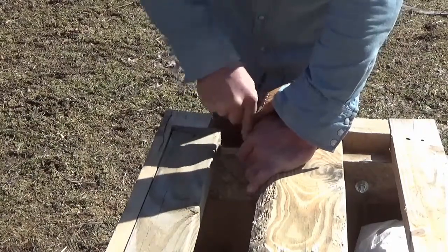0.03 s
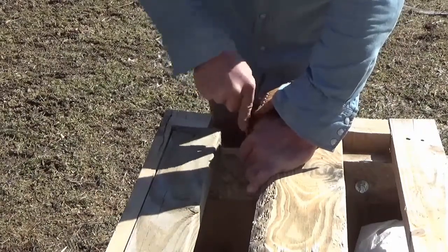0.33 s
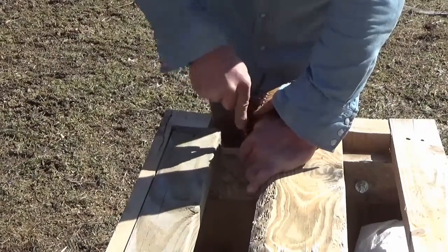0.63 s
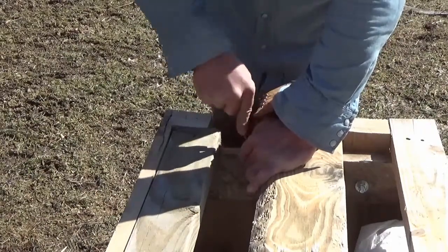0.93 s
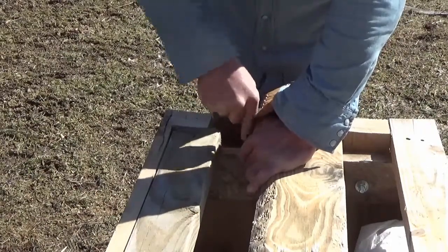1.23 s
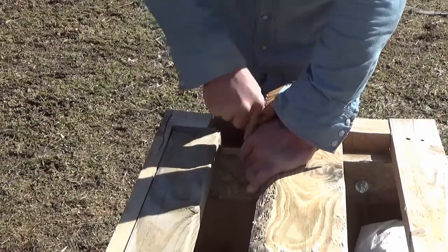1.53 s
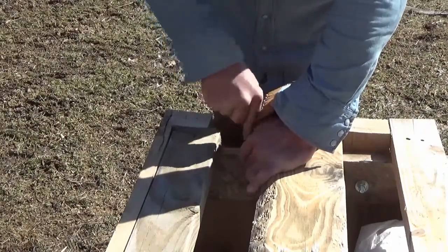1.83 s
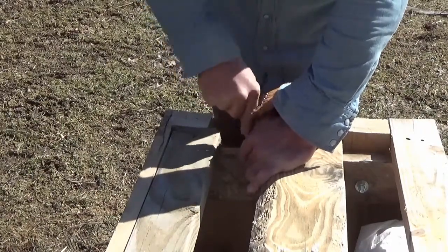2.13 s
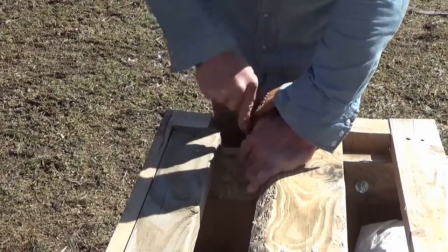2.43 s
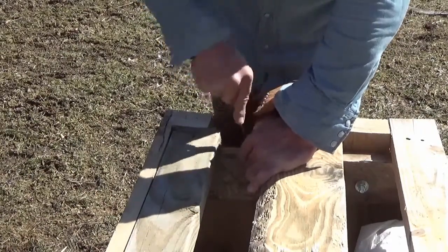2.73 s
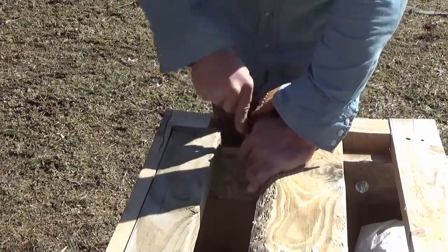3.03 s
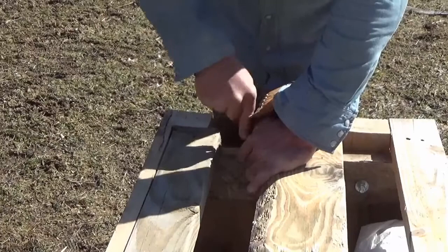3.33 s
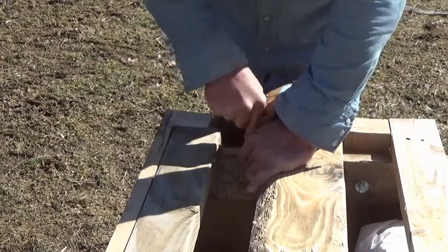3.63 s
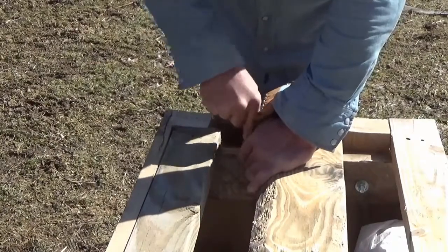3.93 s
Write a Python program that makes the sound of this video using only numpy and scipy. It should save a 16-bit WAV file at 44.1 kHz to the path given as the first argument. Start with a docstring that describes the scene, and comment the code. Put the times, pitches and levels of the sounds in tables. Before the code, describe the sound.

A small hand saw rasps through wood from the start to about 4 seconds, at nearly four back-and-forth strokes a second. Bright, hissing cuts alternate with softer returns, over the hollow resonance of the boards, with scattered snags and faint squeaks. Near 2.8 seconds the blade binds with a brief wooden honk; the next two cuts are weaker, then the sawing recovers. A quiet, distant outdoor rumble lies underneath.

```python
"""Quick to-and-fro rasping: a small hand saw works through wood held on a pallet, outdoors.
The teeth knock the wood at a rate that follows the blade's speed, so each stroke sweeps down through
the boards' modes as it slows. Tearing fibres hiss and ring the blade: cuts are loud and bright,
returns rasp more softly. Now and then a tooth snags, faint squeaks slip in, and once a board honks.
Short reflections off the boards and ground widen the saw over a quiet bed of distant rumble."""
import sys
import numpy as np
from scipy import signal
from scipy.fft import rfft, irfft, next_fast_len
from scipy.io import wavfile

SR = 44100
rng = np.random.default_rng(int(sys.argv[2]) if len(sys.argv) > 2 else 0)


def digitize_waveform(pressure):
    """Quantize a signal to 16-bit integers and store it at the path in sys.argv[1].

    Rows of a 2-D input are taken as channels; values are limited to [-1, 1].
    """
    field = np.atleast_2d(pressure).T
    bounded = np.clip(field, -1, 1)
    quanta = np.round(bounded * 32767).astype(np.int16)
    wavfile.write(sys.argv[1], SR, quanta)


N = 176400
TIME = np.arange(N) / SR
CUTTING, RETURNING = 0, 1   # stroke direction: picks the cut or return level in the tables

# spectrum of the distant rumble and air (frequency [Hz], level [dB])
AIR_SPECTRUM = [(20, -5), (55, -9), (72, 1.5), (105, 5.5), (200, 6.5), (500, -8), (1500, -12.5),
                (5000, -24), (11000, -26)]
# squeaks, mostly faint and between strokes (centre [s], half-length [s], pitch [Hz], level [dB])
SQUEAKS = [(0.248, 0.017, 1630, -49), (0.498, 0.014, 1630, -42.5), (0.659, 0.018, 4140, -50),
           (0.916, .012, 4000, -46), (1.180, 0.014, 4160, -53), (1.183, 0.02, 3300, -49),
           (1.434, 0.025, 1755, -45), (1.683, 0.019, 4060, -54), (1.696, 0.021, 1750, -42),
           (1.947, 0.022, 4014, -51), (2.208, .02, 2160, -50), (2.865, 0.022, 4640, -46),
           (3.122, 0.013, 3316, -44), (3.767, 0.01, 3690, -46)]
# modes of the wood and pallet (frequency [Hz])
WOOD_HZ = [108, 160, 198, 245, 293, 400, 470, 578, 655, 795, 940, 1050, 1218, 1525, 1825, 2035, 2150]
# voicing of each wood mode (bandwidth [Hz], cut level [dB], return level [dB])
WOOD_VOICING = [(19.4, 2, 1.5), (30, 6, 8), (30, 10, 12.5), (36, 12.5, 12.5), (27.8, 18, 17.5),
                (41.2, 8, 1), (29.5, 10, 4.5), (42.3, 9.5, 4.5), (33.2, 11, 11.5), (69, 9.5, -3),
                (32, 8, 3.5), (41.2, 11.5, 7), (44, -18, 0), (42.5, 1, -3.5), (87, 4.5, -3.5),
                (54.4, 7.5, -7.5), (43.3, 4, -3.5)]
# modes of the blade (frequency [Hz])
BLADE_HZ = [2990, 5830, 6190, 7035, 7690, 8680, 8980, 10000]
# voicing of each blade mode (bandwidth [Hz], cut level [dB], return level [dB])
BLADE_VOICING = [(90, 1.5, 5.5), (164, -9, 6.5), (200, -4, 5.5), (124, 7.5, 0), (382, 10, 4),
                 (150, 6.5, 2.5), (240, 3, 5), (210, 0, 5)]
# hiss of tearing fibres (frequency [Hz], cut level [dB], return level [dB])
FIBRE_SPECTRUM = [(40, -19, -34), (122, -4.5, 0.5), (430, -1.5, 7), (1140, 3.5, 6.5), (2380, -3.5, 4),
                  (3750, -4.5, -1), (5220, -13, -2.5), (5980, 3, -6), (7650, -4, -1.5), (9060, 6, 3.5),
                  (11860, -7.5, -6)]
# snagging teeth (time [s], rasp level [dB], knock level [dB])
SNAGS = [(0.272, -21.5, -25), (0.702, -16, -17), (0.796, -18.5, -23), (.807, -21, -26), (1.054, -28.5, -22),
         (1.234, -23, -27), (1.491, -21, -12), (1.708, -20.5, -16), (1.743, -28, -40),
         (2.085, -27.5, -22.5), (2.258, -30, -15), (2.798, -13, -32), (2.815, -15.5, -28),
         (2.888, -14, -10.5), (3.297, -22, -14.5), (3.317, -18, -25), (3.353, -19, -22), (3.858, -20, -25)]
# cutting strokes (start [s], length [s], rasp level [dB], knock level [dB], pressure rise [dB])
CUT_STROKES = [(.139, 0.096, -26.5, -26.5, -4), (.398, 0.083, -23.5, -24.5, 3.5),
               (.670, 0.088, -24, -24.5, 0), (.927, 0.082, -22.5, -24.5, 4.5),
               (1.197, 0.082, -23.5, -25, -4), (1.449, 0.091, -21.5, -24.5, -3),
               (1.707, 0.085, -22.5, -24, 3), (1.967, 0.083, -23, -25, -3.5),
               (2.226, 0.087, -24, -25, -3.5), (2.499, 0.082, -20.5, -23.5, 3),
               (2.762, 0.087, -22, -24, -3.5), (3.048, 0.085, -31.5, -30, 6.5),
               (3.296, 0.084, -28, -26.5, 12), (3.555, .096, -24.5, -25.5, -4),
               (3.812, 0.093, -23, -26, -4)]
# return strokes (start [s], length [s], rasp level [dB], knock level [dB], pressure rise [dB])
RETURN_STROKES = [(.010, .085, -31, -21, 0.5), (.273, 0.075, -32.5, -21.5, -5),
                  (.527, 0.089, -33.5, -23, -1.5), (.797, 0.074, -28, -21, 8),
                  (1.056, 0.089, -34.5, -24, -1), (1.319, 0.069, -29, -21, 0.5),
                  (1.572, 0.091, -34, -25.5, 0.5), (1.828, 0.091, -32.5, -23.5, 1),
                  (2.094, 0.083, -33.5, -24.5, 3.5), (2.352, 0.1, -32.5, -23, 3),
                  (2.623, .096, -32.5, -25.5, 1.5), (2.890, .094, -30, -21.5, 2.5),
                  (3.168, 0.09, -33.5, -26, 2.5), (3.428, 0.083, -31.5, -25, 4),
                  (3.683, 0.09, -30.5, -23, 3.5), (3.933, 0.091, -33.5, -26, -5)]
# contour of a cut (position [stroke lengths], tooth rate [1/s], rasp trim [dB], knock trim [dB])
CUT_CONTOUR = [(-.15, 300, -29, -13), (0, 450, -15.5, -2), (.06, 650, -4.5, 3.5), (.3, 950, -5, 2),
               (.5, 1050, 1.5, 4), (.64, 600, -2.5, 7), (.75, 310, -8.5, 2), (.9, 270, -10, -1),
               (1, 220, -23, -9), (1.25, 120, -40, -24.5)]
# contour of a return (position [stroke lengths], tooth rate [1/s], rasp trim [dB], knock trim [dB])
RETURN_CONTOUR = [(-.2, 199.9, -7.5, -26), (-.01, 300.1, -17, -11.5), (.03, 500.6, 2.5, 2.5),
                  (.22, 798, -0.5, 0), (.48, 997.1, 0, 5), (.64, 638, -2.5, 0), (.78, 297.9, -5.5, 1.5),
                  (.98, 239.3, -19.5, -15.5), (1.25, 120.7, -26.5, -22)]


def from_db(db):
    """Decibels to gain."""
    return 10 ** (np.asarray(db) / 20)


def drift(hz):
    """A smooth random modulator of spread 1, moving at rates up to about hz."""
    lowpass = signal.butter(2, hz, fs=SR, output="sos")
    wander = signal.sosfilt(lowpass, rng.standard_normal(N + SR))[SR:]
    return wander / wander.std()


def colour(x, hz, db):
    """Minimum-phase EQ through the given points, so nothing rings ahead of an attack."""
    size = 2 * next_fast_len(N)
    grid_hz = np.maximum(np.arange(size // 2 + 1) * SR / size, 1)
    curve_db = np.interp(np.log(grid_hz), np.log(hz), db)
    cepstrum = irfft(np.log(from_db(curve_db)))
    cepstrum[1:size // 2] *= 2
    cepstrum[size // 2 + 1:] = 0
    return irfft(rfft(x, size) * np.exp(rfft(cepstrum)))[..., :N]


def outdoor_air(gain_db=-30, side_db=-20):
    """A quiet bed of distant rumble and air, nearly mono."""
    mid, side = colour(rng.standard_normal((2, N)), *np.transpose(AIR_SPECTRUM))
    return from_db(gain_db) * (mid + from_db(side_db) * side * np.array([[1], [-1]]))


def reflections(x, send_db=-9, t60_s=0.089, predelay_s=.002, low_cut_hz=540):
    """The boards and ground throw back a short, bright spray, different on each side."""
    age = TIME[:SR // 2]
    spray = rng.standard_normal((2, len(age))) * from_db(-60 * age / t60_s) * (age > predelay_s)
    spray /= np.sqrt(np.sum(spray ** 2, axis=1, keepdims=True))
    bright = signal.sosfilt(signal.butter(1, low_cut_hz, "high", fs=SR, output="sos"), x)
    return from_db(send_db) * signal.fftconvolve(bright[None], spray, axes=1)[:, :N]


def squeak(centre, half_length, hz, db, wobble=0.087, wobble_hz=300):
    """A short, wavering tone that swells and fades."""
    near = abs(TIME - centre) < 2 * half_length
    pitch = hz * (1 + wobble * drift(wobble_hz)[near])
    swell = np.exp(-2 * ((TIME[near] - centre) / half_length) ** 2)
    tone = np.zeros(N)
    tone[near] = from_db(db) * swell * np.sin(2 * np.pi * np.cumsum(pitch) / SR)
    return tone


def wood_body(force, direction, soften_hz=3440):
    """Wood gives under a tooth, dulling the knock that rings its modes in alternating polarity."""
    softened = signal.sosfilt(signal.butter(2, soften_hz, fs=SR, output="sos"), force)
    return sum((-1) ** k * from_db(db[direction]) * resonate(softened, WOOD_HZ[k], width)
               for k, (width, *db) in enumerate(WOOD_VOICING))


def resonate(x, hz, width):
    """One ringing mode, width Hz wide, with unity gain at its peak."""
    radius = np.exp(-np.pi * width / SR)
    feedforward = np.array([1, 0, -1]) * (1 - radius ** 2) / 2
    feedback = [1, -2 * radius * np.cos(2 * np.pi * hz / SR), radius ** 2]
    return signal.lfilter(feedforward, feedback, x + 1e-18)


def tearing_fibres(grit, direction):
    """Fibres hiss as they tear and set the blade ringing; both ride the grit envelope."""
    scrape = grit * rng.standard_normal(N)
    blade_ring = sum(from_db(db[direction]) * resonate(scrape, hz, width)
                     for hz, (width, *db) in zip(BLADE_HZ, BLADE_VOICING))
    hz, *db = np.transpose(FIBRE_SPECTRUM)
    hiss = colour(grit * rng.standard_normal(N), hz, db[direction])
    return blade_ring + hiss


def snags(attack_s=.0008, decay_s=0.0045):
    """A tooth catches and tears free: a brief, hard accent in both wood and fibres."""
    grit, knock = np.zeros((2, N))
    for start, rasp_db, knock_db in SNAGS:
        age = np.maximum(TIME - start, 0)
        burst = (1 - np.exp(-age / attack_s)) * np.exp(-np.minimum(age / decay_s, 20))
        grit += from_db(rasp_db) * burst
        knock += from_db(knock_db) * burst
    return wood_body(knock * rng.standard_normal(N), CUTTING) + tearing_fibres(grit, CUTTING)


def stroke_envelopes(strokes, contour):
    """The blade's speed and pressure shape each stroke's tooth rate, rasp and knock."""
    position, teeth_per_s, rasp_trim, knock_trim = np.transpose(contour)
    rate, rasp, knock = np.zeros((3, N))
    for start, length, rasp_db, knock_db, rise_db in strokes:
        moving = (TIME > start + position[0] * length) & (TIME < start + position[-1] * length)
        along = (TIME[moving] - start) / length
        pressure_db = rise_db * (along - .5)
        rate[moving] = np.interp(along, position, teeth_per_s)
        rasp[moving] = from_db(rasp_db + pressure_db + np.interp(along, position, rasp_trim))
        knock[moving] = from_db(knock_db + pressure_db + np.interp(along, position, knock_trim))
    return rate, rasp, knock


def tooth_clicks(rate, wobble=.12, wobble_hz=300, spread_db=2.8):
    """Each passing tooth gives one click of uneven strength; the blade's speed wobbles."""
    uneven_rate = rate * np.exp(wobble * drift(wobble_hz))
    teeth_passed = np.floor(np.cumsum(uneven_rate) / SR)
    strength = from_db(spread_db * np.clip(rng.standard_normal(N), -2, 2))
    return np.diff(teeth_passed, prepend=0) * strength


def saw(strokes, contour, direction, burst_s=0.00054, chatter_db=1.8, chatter_hz=125):
    """Each tooth knocks the wood and tears a short burst of fibres, over steady rubbing."""
    strike_db, rubbing_db, smooth_rasp_db = 11.5, -5, -5
    rate, rasp, knock = stroke_envelopes(strokes, contour)
    clicks = tooth_clicks(rate)
    chatter = from_db(chatter_db * drift(chatter_hz))   # the blade bounces in the kerf
    bursts = signal.lfilter([1], [1, -np.exp(-1 / (burst_s * SR))], clicks + 1e-18)
    rubbing = from_db(rubbing_db) * rng.standard_normal(N)
    force = knock * chatter * (from_db(strike_db) * clicks + rubbing)
    grit = rasp * chatter * np.hypot(bursts, from_db(smooth_rasp_db))
    return wood_body(force, direction) + tearing_fibres(grit, direction)


def scene(pan_right_db=1.1):
    """The saw sits just right of centre, in the open air."""
    sawing = saw(CUT_STROKES, CUT_CONTOUR, CUTTING)
    sawing += saw(RETURN_STROKES, RETURN_CONTOUR, RETURNING)
    sawing += snags()
    sawing += squeak(centre=2.818, half_length=.018, hz=585, db=-23)   # the saw binds, a board honks
    sawing += sum(squeak(*row) for row in SQUEAKS)
    pan = from_db(pan_right_db / 2 * np.array([[-1], [1]]))
    return sawing * pan + reflections(sawing) + outdoor_air()


def record(dry, cutoff_hz=11050):
    """A steep high cut takes the top off the mix."""
    return signal.sosfilt(signal.ellip(10, .2, 70, cutoff_hz, fs=SR, output="sos"), dry)


dry = scene()
out = record(dry)
digitize_waveform(out)
```